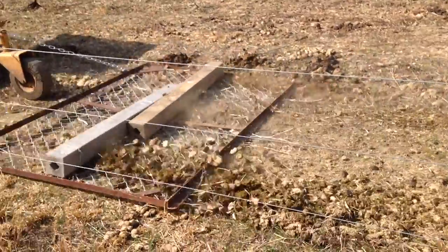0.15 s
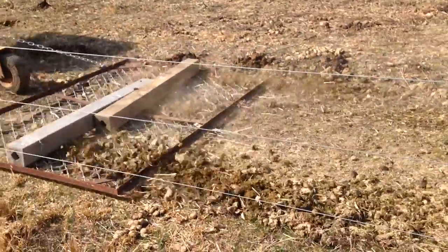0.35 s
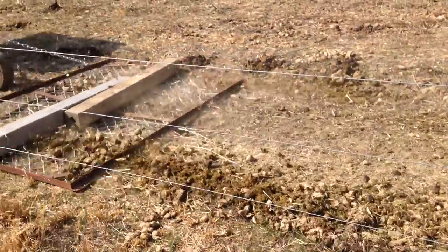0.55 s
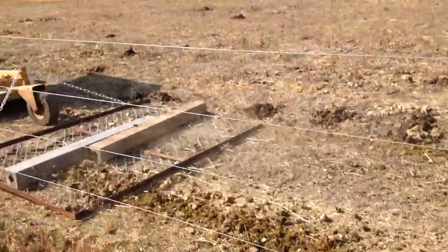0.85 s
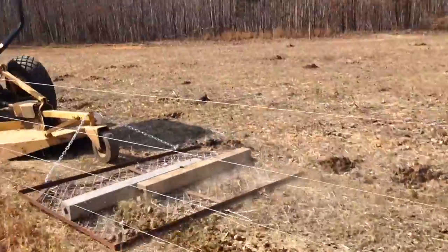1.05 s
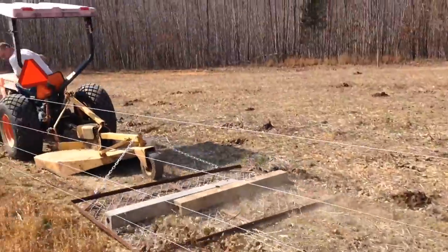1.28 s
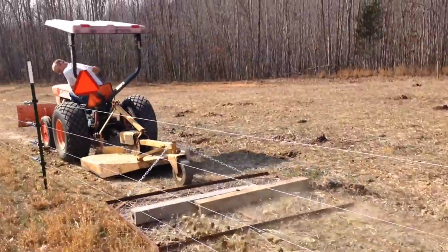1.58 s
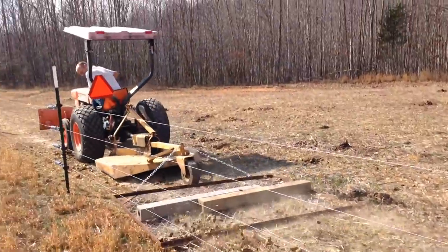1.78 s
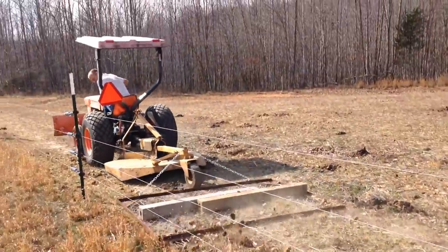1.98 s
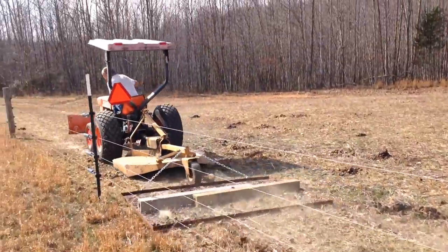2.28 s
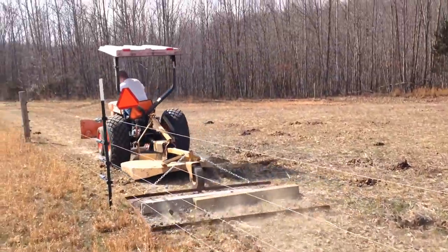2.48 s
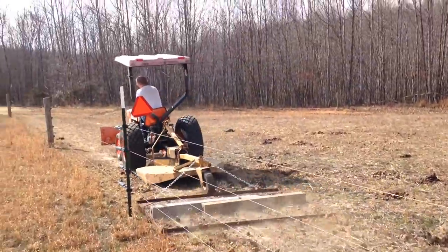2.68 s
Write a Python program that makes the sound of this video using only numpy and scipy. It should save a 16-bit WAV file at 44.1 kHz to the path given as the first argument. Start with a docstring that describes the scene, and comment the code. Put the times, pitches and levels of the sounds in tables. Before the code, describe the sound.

Small diesel tractor drones steadily while dragging a rattling, scraping steel frame over dry pasture

```python
"""Diesel tractor dragging a steel frame

A small three-cylinder tractor pulls a drag frame over a dry pasture, away from the microphone.
Firing pulses ring the exhaust and gate the noise of the clattering block. The frame and its wire mesh
scrape over grass and clods (gritty noise), tap and knock on stones and rattle (bursts, ringing modes).
Wind puffs rumble at the microphone (low noise of varying level)."""
import sys
import numpy as np
from scipy import signal
from scipy.fft import rfft, irfft
from scipy.io import wavfile
from scipy.ndimage import uniform_filter1d

SR = 44100
rng = np.random.default_rng(int(sys.argv[2]) if len(sys.argv) > 2 else 0)


def generate_wav(sig):
    """Save sig (samples, or channels by samples) to the path in sys.argv[1] as 16-bit PCM at SR."""
    pcm = np.round(np.clip(np.atleast_2d(sig).T, -1, 1) * 32767).astype(np.int16)
    wavfile.write(sys.argv[1], SR, pcm)


def field_ratio(decibels):
    """Amplitude ratio for a level in dB (20 dB per decade); scalars and array-likes work."""
    return 10 ** (np.asarray(decibels, dtype=float) / 20)


N = 124803


def curve(table, col):
    """One column of a table, interpolated over time."""
    rows = np.array(table, float)
    return np.interp(np.arange(N) / SR, rows[:, 0], rows[:, col])


def unit(x):
    """Scale to rms 1."""
    return x / np.sqrt(np.mean(x ** 2))


def colour(x, points):
    """Minimum-phase filter with the given (Hz, dB) response, made by folding the cepstrum."""
    rows, size = np.array(points, float), 8192
    hz = np.maximum(np.arange(size // 2 + 1) * SR / size, 1)
    response_db = np.interp(np.log(hz), np.log(rows[:, 0]), rows[:, 1])
    cepstrum = irfft(response_db * np.log(10) / 20)
    cepstrum[1:size // 2] *= 2
    cepstrum[size // 2 + 1:] = 0
    impulse = irfft(np.exp(rfft(cepstrum)))
    return signal.fftconvolve(x, impulse)[:len(x)]


def walk(rate_hz):
    """Slow random drift, spread near 1: held random steps, smoothed twice."""
    hold = max(int(SR / rate_hz), 1)
    steps = np.repeat(rng.standard_normal(N // hold + 1), hold)
    return 1.3 * uniform_filter1d(uniform_filter1d(steps, hold), hold)[:N]


def flickering(x, points, shared_db, own_db, rate_hz):
    """Coloured sound whose octave bands waver together and alone, at rms 1."""
    spectrum = rfft(colour(x, points))
    hz = np.maximum(np.arange(N // 2 + 1) * SR / N, 1)
    out, shared = 0, walk(rate_hz)
    for centre_hz in 40 * 2. ** np.arange(9):
        octaves_off = np.clip(np.log2(hz / centre_hz), -1, 1)
        band = irfft(spectrum * np.cos(np.pi / 2 * octaves_off) ** 2, N)
        out = out + band * field_ratio(shared_db * shared + own_db * walk(rate_hz))
    return unit(out)


def gritty():
    """Steady noise plus 250 decaying ticks of noise a second, of uneven strength."""
    hit = rng.random(N) < 250 / SR
    strength = hit * field_ratio(4 * rng.exponential(size=N))
    tick_decay_s = 0.0029
    envelope = signal.lfilter([1], [1, -np.exp(-1 / (tick_decay_s * SR))], strength)
    ticks = envelope * rng.standard_normal(N)
    return rng.standard_normal(N) + field_ratio(-7.5) * unit(ticks)


def blows(rows, octaves, modes, ring_db, ring_t60_s):
    """Each blow (s, dB, centre Hz, t60 s) is a grainy noise burst; modes near its centre ring."""
    size, rise_s, grain_db = 8192, .0015, 1.8
    out = np.zeros(N + size)
    t, hz = np.arange(size) / SR, np.maximum(np.arange(size // 2 + 1) * SR / size, 1)
    ring_decay = np.exp(-np.log(1000) * t / ring_t60_s)
    rise = 1 - np.exp(-t / rise_s)  # builds over a few links

    def near(f, centre_hz):
        """Bell on the octave scale: 1 at the centre."""
        return np.exp(-.5 * (np.log2(f / centre_hz) / octaves) ** 2)

    for start_s, db, centre_hz, t60_s in rows:
        noise = rng.standard_normal(size)
        burst = unit(irfft(rfft(noise) * near(hz, centre_hz), size)) / 2
        burst *= field_ratio(grain_db * np.repeat(rng.standard_normal(size // 64), 64))
        burst *= np.exp(-np.log(1000) * t / max(t60_s, .005))
        for mode in modes:
            mode_hz, mode_db = mode[:2]
            gain = field_ratio(ring_db + mode_db / 2) * near(mode_hz, centre_hz) * rng.standard_normal() / 2
            detuned_hz = mode_hz * (1 + 0.0095 * rng.standard_normal())
            burst += gain * np.sin(2 * np.pi * detuned_hz * t) * ring_decay
        i = int(start_s * SR)
        out[i:i + size] += field_ratio(db) * burst * rise
    return out[:N]


# Each row: time in s, firing rate in Hz before jitter, then levels in dB before the exhaust trim
# of orders 1-2, order 3, order 4 and order 5.
ENGINE_ORDERS = [(0.0, 57.9, -28, -30, -34, -32), (0.05, 55.8, -24, -29, -32, -34),
                 (0.08, 55.8, -28, -27, -33, -34), (0.24, 55.6, -27, -32, -34, -36),
                 (0.4, 55.8, -26, -30, -31, -35), (0.74, 55.9, -27, -31, -34, -41),
                 (0.87, 54.5, -27, -32, -32, -37), (0.98, 54.5, -26, -29, -27, -35),
                 (1.57, 55.8, -28, -32, -31, -40), (1.98, 55.2, -31, -30, -30, -38),
                 (2.21, 55.4, -28, -32, -29, -38), (2.33, 55.9, -28, -31, -32, -38),
                 (2.55, 55.9, -30, -31, -35, -43), (2.69, 54.7, -33, -30, -30, -41),
                 (2.77, 54.8, -37, -48, -32, -38), (2.79, 54.8, -28, -41, -31, -38),
                 (2.83, 55.0, -45, -32, -30, -38)]
# Levels of the orders above the fifth, which bark while the engine labours.
# Each row: time in s, level in dB before the exhaust trim.
BARK = [(0, -46), (.3, -47), (.85, -45), (1.05, -38.5), (1.38, -38.5), (1.55, -47), (2.0, -44), (2.4, -45),
        (2.83, -48)]
# Exhaust response. Each row: multiple of the mean firing rate, relative level in dB.
EXHAUST_RESPONSE = [(1, -9), (2, 0), (3, -3), (4, -2), (5, -10), (6, -26), (7, -19), (8, -20), (9, -25),
                    (10, -25), (11, -27)]
# Borders between the order bands, in Hz.
ORDER_SPLIT_HZ = (150, 205, 260, 345)
# Delay of each order band in s: higher orders leave the muffler later.
MUFFLER_LAG_S = (0, .0037, .00655, .0068, .0084)
# Firing strength of each cylinder in turn, in dB before scatter.
CYLINDER_DB = (3, 2.5, 1.6)
# Block clatter and fan roar. Each row: frequency in Hz, relative level in dB.
CLATTER_COLOUR = [(250, -26.5), (310, -7.5), (345, -14), (404, -5), (618, -11), (700, -12), (830, -10.5),
                  (1200, -12), (1600, -11.5), (1950, -11.5), (2350, -16), (2700, -17.5), (3900, -40.5),
                  (6600, -98)]
# Levels for engine(), scrape() and taps(). Each row: time in s, then levels in dB before each
# layer's trim of clatter, mesh hiss and clod crunch.
DRAG_LEVELS = [(0.0, -32, -40.5, -37.5), (0.05, -36, -43, -42.5), (0.1, -33.5, -39, -33.5),
               (0.16, -34.5, -43, -34), (0.2, -36.5, -42, -36.5), (0.48, -36.5, -42.5, -41),
               (0.58, -34, -41.5, -38.5), (0.6, -36, -43, -42), (0.73, -33.5, -40.5, -41),
               (0.78, -33, -40.5, -42.5), (0.85, -34, -39.5, -40), (0.94, -33.5, -39.5, -43),
               (1.12, -33.5, -41, -39.5), (1.13, -36.5, -44, -44), (1.18, -33, -40, -39.5),
               (1.28, -36.5, -43.5, -45), (1.74, -38, -42.5, -46.5), (1.75, -32, -38, -41),
               (1.76, -37, -42, -43), (1.82, -36.5, -43.5, -47), (2.14, -38, -43.5, -47.5),
               (2.24, -41, -43.5, -49), (2.25, -32.5, -41, -43), (2.31, -37.5, -47.5, -47.5),
               (2.45, -39, -45, -48), (2.54, -37, -43, -38), (2.55, -38.5, -44, -49), (2.57, -39, -43, -47),
               (2.72, -39, -45.5, -46.5), (2.83, -37.5, -41, -44)]


def engine():
    """Firings ring the exhaust; each one also gates the clatter of the block."""
    jitter, scatter_db = .002, .6
    lead = 8192  # samples of firing before the start
    firing_hz = curve(ENGINE_ORDERS, 1) * (1 + jitter * walk(25))
    phase = np.cumsum(np.r_[np.full(lead, firing_hz[0]), firing_hz]) / SR
    firings = np.flatnonzero(np.diff(np.floor(phase)))
    pulses = np.zeros(N + lead)
    strength_db = np.resize(CYLINDER_DB, len(firings)) + scatter_db * rng.standard_normal(len(firings))
    pulses[firings] = field_ratio(strength_db)

    mean_hz = firing_hz.mean()
    pipe = [(5.6, -58)] + [(k * mean_hz, db) for k, db in EXHAUST_RESPONSE] + [(1200, -53.5)]
    note = colour(pulses, pipe)
    lows = [0]
    for split_hz in ORDER_SPLIT_HZ:
        lowpass = signal.cheby2(10, 40, split_hz, fs=SR, output="sos")
        lows.append(signal.sosfiltfilt(lowpass, note))
    lows.append(note)
    levels_db = [curve(ENGINE_ORDERS, k) for k in range(2, 6)] + [curve(BARK, 1)]
    exhaust = 0
    for low, high, lag_s, db in zip(lows, lows[1:], MUFFLER_LAG_S, levels_db):
        band = np.roll(high - low, int(lag_s * SR))[lead:]
        exhaust = exhaust + unit(band) * field_ratio(db)
    exhaust = exhaust * field_ratio(-0.1)

    gated_share, decay_periods = 0.35, 0.35
    gate = 1 - gated_share + gated_share * np.exp(-(phase[lead:] % 1) / decay_periods)
    noise = gate * rng.standard_normal(N)
    clatter = flickering(noise, CLATTER_COLOUR, shared_db=0.16, own_db=0.6, rate_hz=14)
    return exhaust + clatter * field_ratio(curve(DRAG_LEVELS, 1) - 1.0)


# Mesh in dry grass. Each row: frequency in Hz, relative level in dB.
HISS_COLOUR = [(2000, -38), (3200, -7.5), (5100, -4.5), (7000, -1.5), (10000, 0), (12200, -1), (14700, 3),
               (16000, 4)]
# Clods breaking. Each row: frequency in Hz, relative level in dB.
CRUNCH_COLOUR = [(2000, -27), (3000, -3.5), (3700, -0.5), (4500, -3.5), (5500, -4.5), (7000, -9.5),
                 (10000, -44)]


def scrape():
    """Mesh hisses through dry grass and bars crunch the clods: two colours of gritty noise."""
    hiss = flickering(gritty(), HISS_COLOUR, shared_db=0.27, own_db=1.1, rate_hz=25)
    crunch = flickering(gritty(), CRUNCH_COLOUR, shared_db=1.0, own_db=2.3, rate_hz=25)
    return hiss * field_ratio(curve(DRAG_LEVELS, 2) + 1.2) + crunch * field_ratio(curve(DRAG_LEVELS, 3) - 0.5)


# Modes of the bars, for taps() and knocks(). Each row: frequency in Hz before drift or detuning,
# relative level in dB (halved in blows).
FRAME_MODES = [(440, -6.5), (580, -0.5), (800, 1.5), (1100, -1.5), (1420, -7), (1570, 1.5), (1810, 2.5),
               (1940, -4.5), (2140, -1.5), (2350, -2)]
FRAME_T60_S = 0.12


def taps():
    """Stones tap the bars: random hits ring each frame mode and the lowest mesh mode."""
    hits_per_s, spread_db = 140, 2  # for each mode
    decay = np.exp(-np.log(1000) / (FRAME_T60_S * SR))
    out = 0
    for mode in FRAME_MODES + MESH_MODES[:1]:
        mode_hz, mode_db = mode[:2]
        hit = rng.random(N) < hits_per_s / SR
        strength = hit * field_ratio(spread_db * rng.exponential(size=N) + mode_db)
        kick = strength * np.exp(2j * np.pi * rng.random(N))  # random phase
        envelope = signal.lfilter([1], [1, -decay], kick)
        drifting_hz = mode_hz * (1 + .02 * walk(8))
        out = out + np.imag(envelope * np.exp(2j * np.pi * np.cumsum(drifting_hz) / SR))
    return unit(out) * field_ratio(curve(DRAG_LEVELS, 1) - 8)


# Each row: time in s, rumble level in dB.
WIND_LEVEL = [(0, -28.5), (.18, -32), (.26, -35), (.42, -34), (.55, -36.5), (.78, -31), (.88, -32),
              (1.07, -33), (1.14, -37), (1.65, -38), (1.8, -33.5), (2.05, -37.5), (2.3, -38), (2.5, -36.5),
              (2.66, -38), (2.73, -32.5), (2.83, -33)]
# Each row: frequency in Hz, relative level in dB.
WIND_COLOUR = [(20, -18), (45, -7), (80, -4), (150, -1), (240, -2.5), (300, -10), (350, -24.5), (600, -48)]


def wind():
    """Low puffs of turbulence at the microphone: wavering low noise."""
    rumble = flickering(rng.standard_normal(N), WIND_COLOUR, shared_db=-1.0, own_db=0.9, rate_hz=17)
    return rumble * field_ratio(curve(WIND_LEVEL, 1))


RATTLE_OCTAVES, RING_DB, RING_T60_S = .42, -4, 0.076


def stray_rattles():
    """Seventy small rattles at random moments, short bursts without modes."""
    rows = [(when * N / SR, -42 + 8 * strength, 3500 * 4 ** pitch, .04)
            for when, strength, pitch in rng.random((70, 3))]
    return blows(rows, RATTLE_OCTAVES, [], RING_DB, RING_T60_S)


# Dull knocks of the bars. Each row: start in s, level in dB, centre in Hz, burst T60 in s.
KNOCKS = [(0.029, -24.5, 690, 0.1), (0.154, -21, 1580, 0.1), (0.819, -27, 584, 0.12),
          (0.849, -25, 584, 0.14), (1.019, -27.5, 1880, 0.12), (1.049, -26.5, 1860, 0.11),
          (1.099, -28, 501, 0.12), (1.199, -27, 1620, 0.13), (1.459, -29.5, 1433, 0.12),
          (2.251, -29.5, 1780, 0.12), (2.287, -29, 1660, 0.12)]


def knocks():
    """Bars knock dully: each blow rings the frame modes near its centre."""
    return blows(KNOCKS, octaves=.5, modes=FRAME_MODES, ring_db=-8.5, ring_t60_s=FRAME_T60_S)


# Mesh and chain rattles. Each row: start in s, body level in dB, sizzle level in dB before trim,
# burst T60 in s.
RATTLES = [(0.0917, -25, -35.5, 0.09), (0.11, -28, -35.5, 0.12), (0.139, -28, -39, 0.083),
           (0.2494, -26, -42, 0.078), (0.3188, -37, -36, 0.09), (0.3371, -26, -33, 0.063),
           (0.3794, -27.5, -41, 0.07), (0.5692, -34, -37, 0.072), (0.7344, -25, -42, 0.09),
           (0.9162, -27, -27.5, 0.073), (0.9278, -34, -47, 0.09), (1.004, -38, -33, 0.078),
           (1.0116, -31, -40, 0.083), (1.0544, -26, -45, 0.069), (1.1099, -33, -38.5, 0.09),
           (1.1746, -29.5, -34.5, 0.09), (1.1994, -29, -32, 0.09), (1.3094, -32.5, -37, 0.07),
           (1.4642, -33, -37, 0.1), (1.5494, -40, -39, 0.09), (1.5974, -35, -36, 0.098),
           (1.6494, -37, -41, 0.087), (1.7068, -46, -42, 0.076), (1.7489, -26.5, -33, 0.075),
           (1.8764, -42, -38, 0.09), (1.9135, -30, -35.5, 0.095), (2.0989, -41, -40, 0.098),
           (2.2511, -26, -39, 0.071), (2.288, -33, -45, 0.09), (2.4892, -40, -42, 0.09),
           (2.5303, -32, -30, 0.079), (2.5988, -36, -38, 0.09), (2.7469, -33, -39, 0.082),
           (2.8117, -29.5, -32, 0.09)]
# Each row: frequency in Hz before drift or detuning, relative level in dB (halved in blows),
# T60 in s (not read).
MESH_MODES = [(3510, -17, 0.13), (6030, 8, 4.6), (7960, -40, 0.35), (8640, -3, 0.018), (9520, -5, 0.081),
              (10350, -8, 0.24), (11240, -8, 0.07), (11750, -5, 0.071), (13970, -18, 0.25)]


def rattles():
    """Mesh and chain rattle: a body and a sizzle burst each, ringing the mesh modes."""
    body_hz, sizzle_hz, sizzle_trim_db = 3960, 10000, 5.5
    rows = [(s, body_db, body_hz, t60_s) for s, body_db, _, t60_s in RATTLES]
    rows += [(s, sizzle_db + sizzle_trim_db, sizzle_hz, t60_s) for s, _, sizzle_db, t60_s in RATTLES]
    return blows(rows, RATTLE_OCTAVES, MESH_MODES, RING_DB, RING_T60_S)


def scene():
    """All sources, one microphone."""
    return (engine() + scrape() + taps() + wind() + stray_rattles() + knocks() + rattles())[None]


def band_limit(x):
    """A steep low-pass at the top of the band."""
    return signal.sosfilt(signal.butter(12, 16520, fs=SR, output="sos"), x)


# Microphone response. Each row: frequency in Hz, level in dB.
MIC_RESPONSE = [(15, -4), (40, 0), (80, 0.5), (2350, -1), (2800, -4.5), (3250, -1), (14000, -1.5)]


def record(dry):
    """Microphone colour with a dip from its housing, then the top cut off at 15480 Hz."""
    top_cut = signal.ellip(10, .2, 70, 15480, fs=SR, output="sos")
    mix = signal.sosfilt(top_cut, colour(dry[0], MIC_RESPONSE))
    return band_limit(mix[None])


dry = scene()
out = record(dry)
generate_wav(out)
```